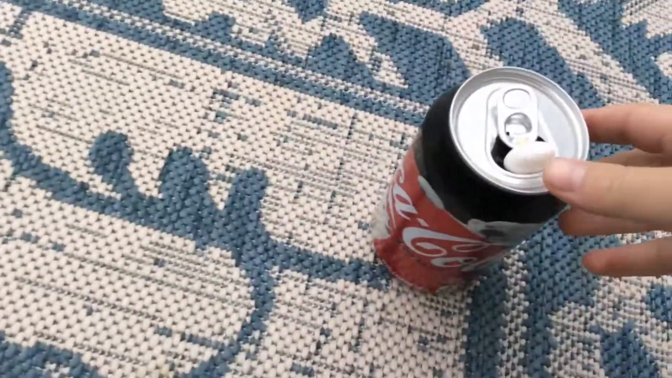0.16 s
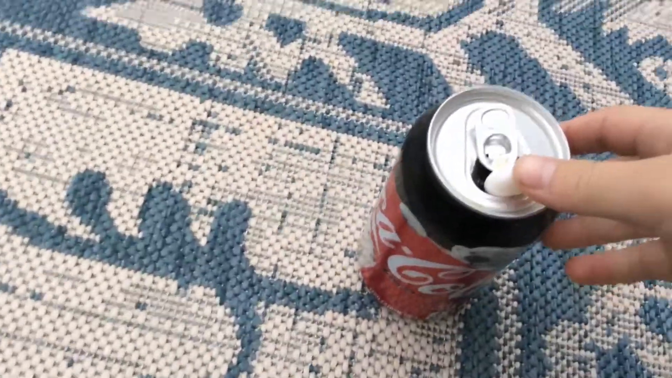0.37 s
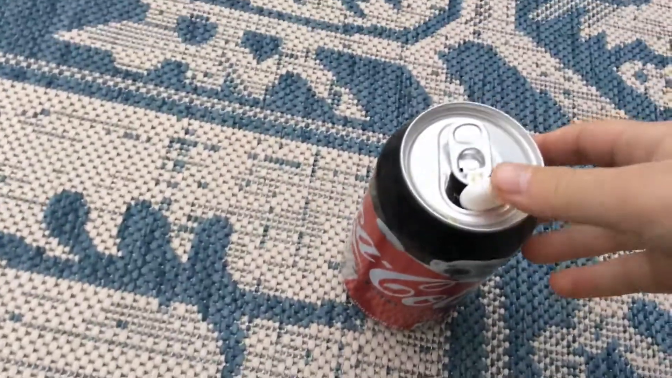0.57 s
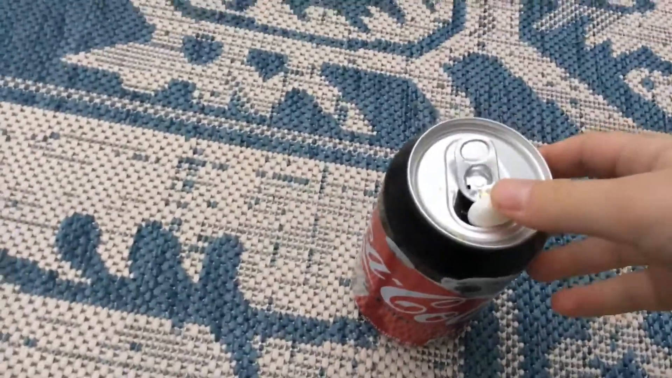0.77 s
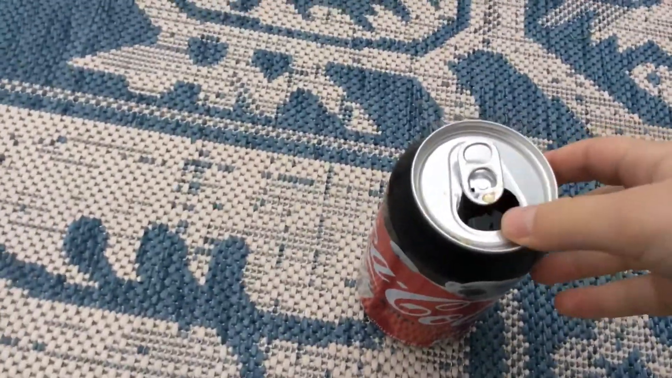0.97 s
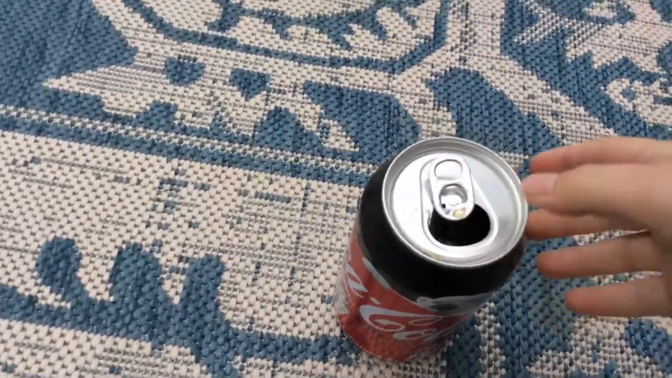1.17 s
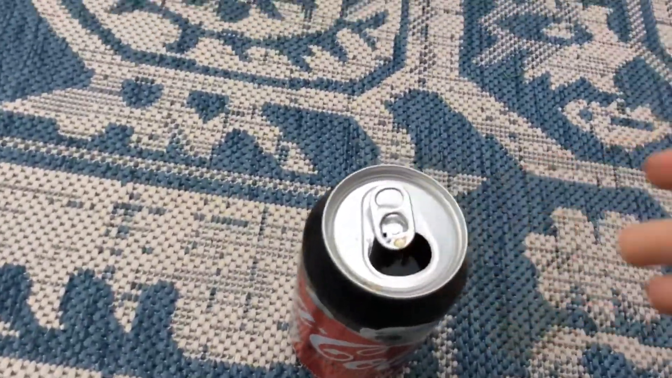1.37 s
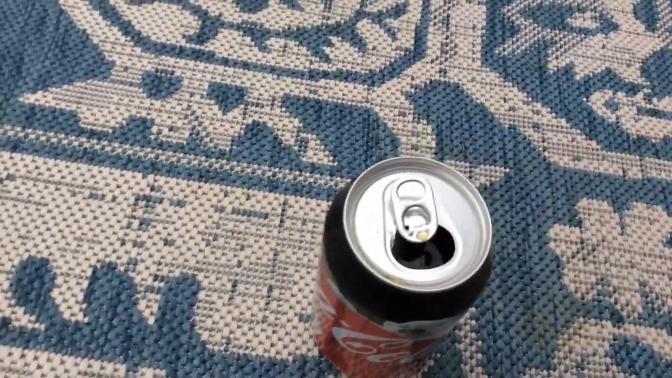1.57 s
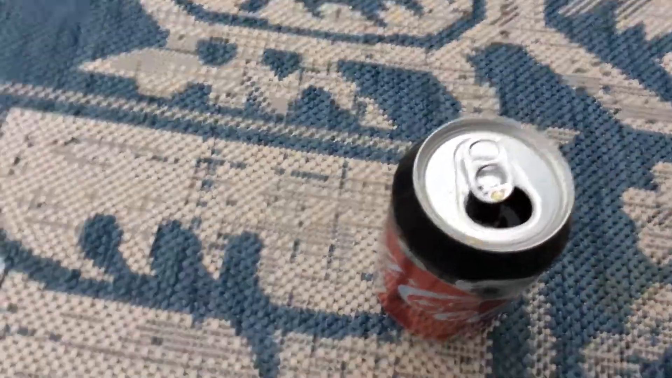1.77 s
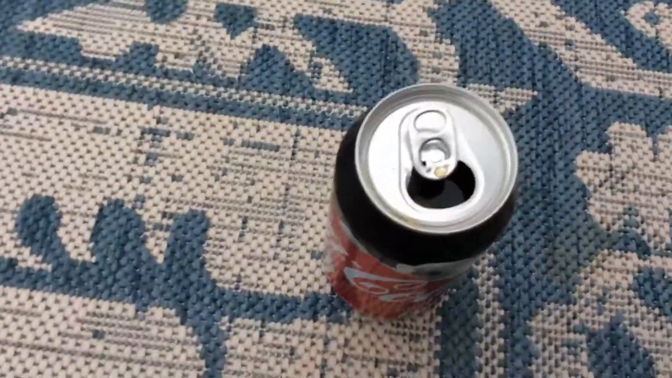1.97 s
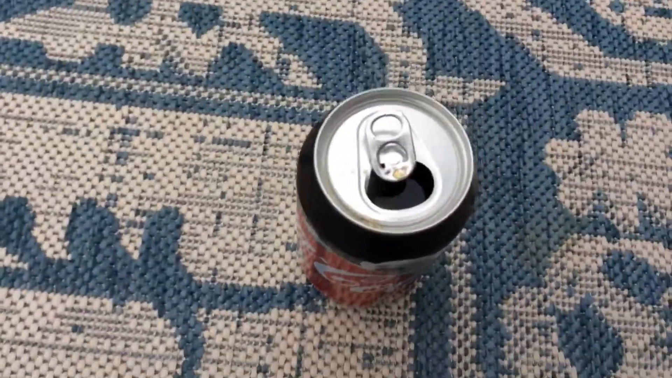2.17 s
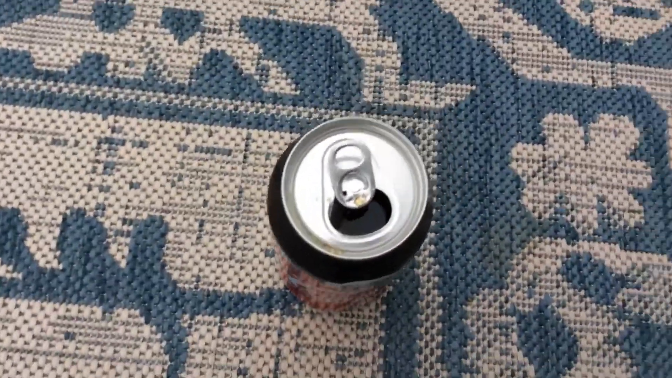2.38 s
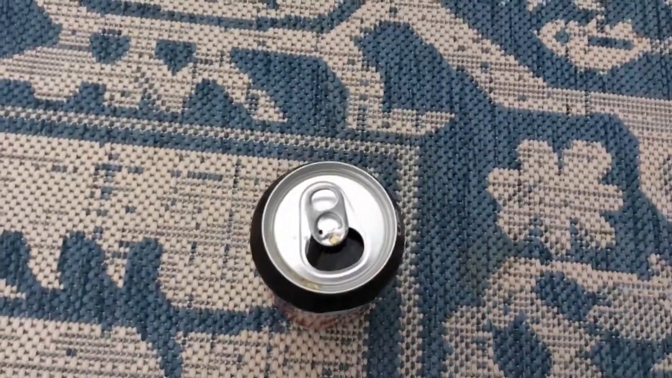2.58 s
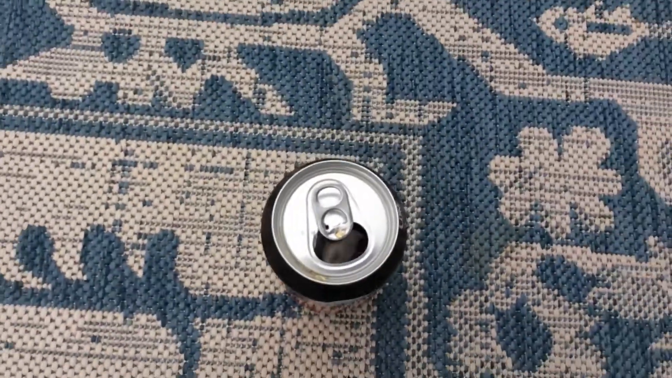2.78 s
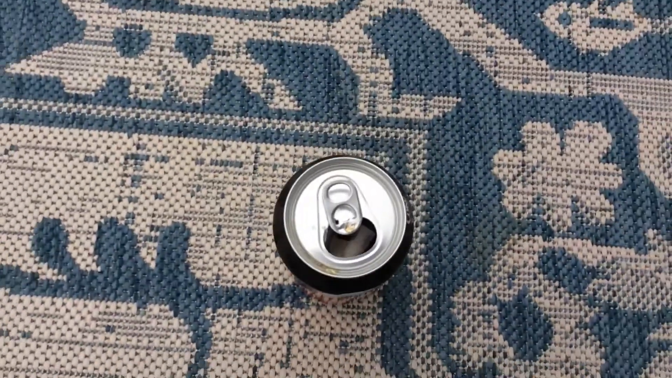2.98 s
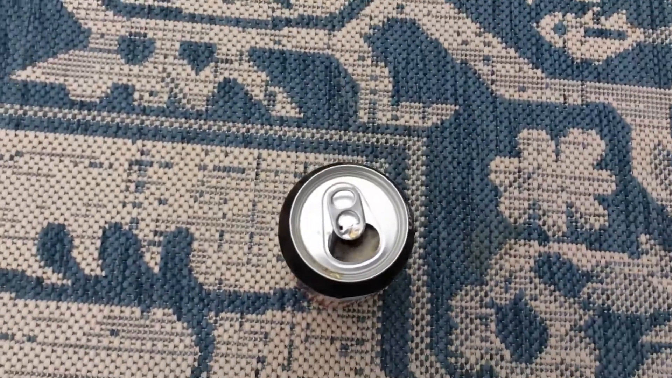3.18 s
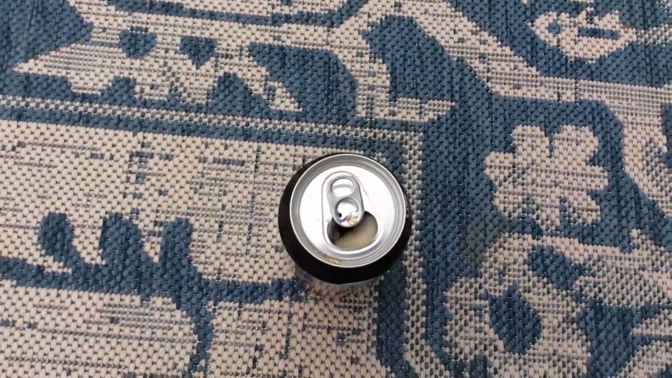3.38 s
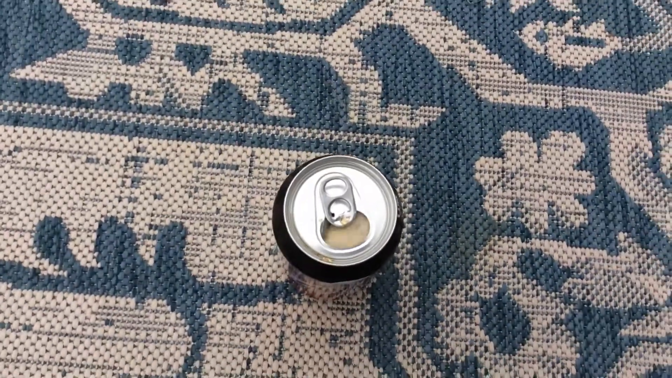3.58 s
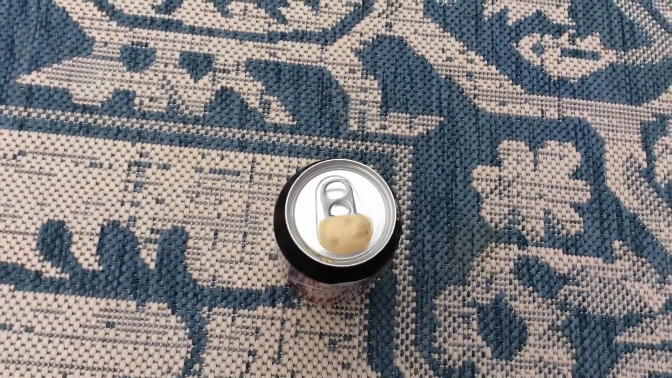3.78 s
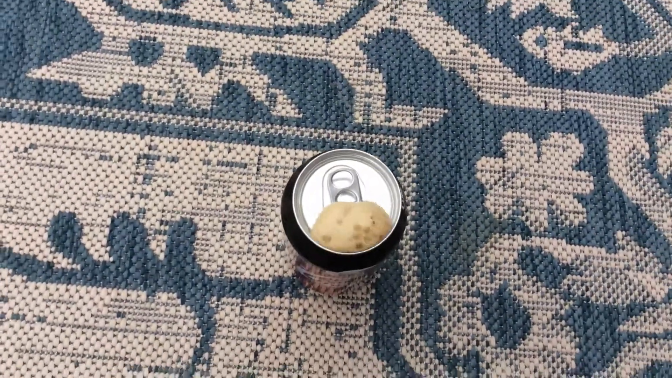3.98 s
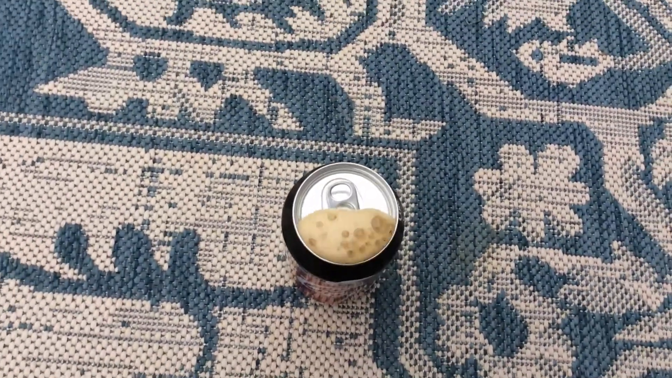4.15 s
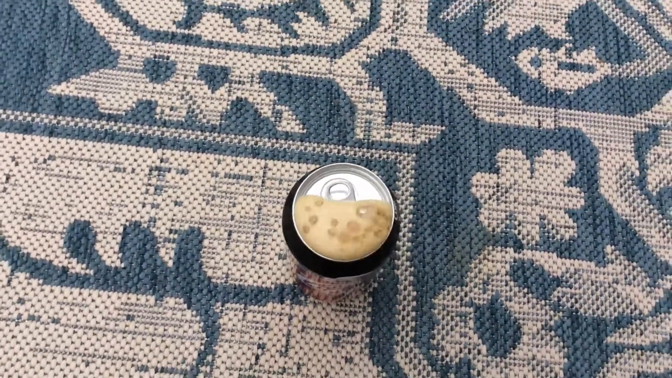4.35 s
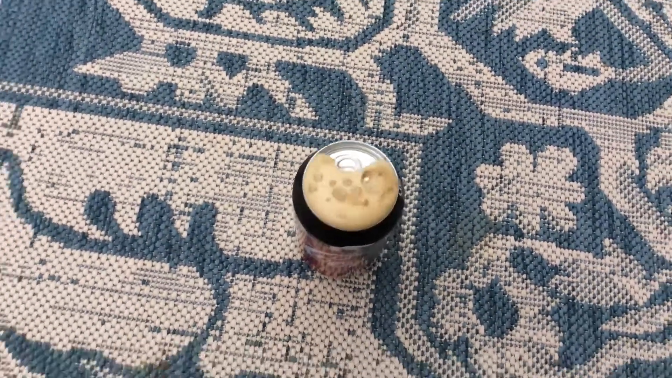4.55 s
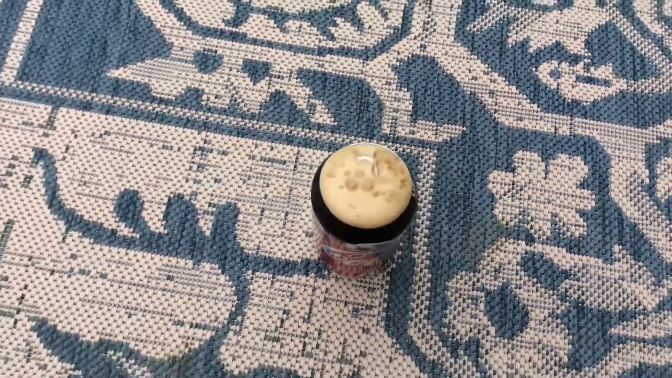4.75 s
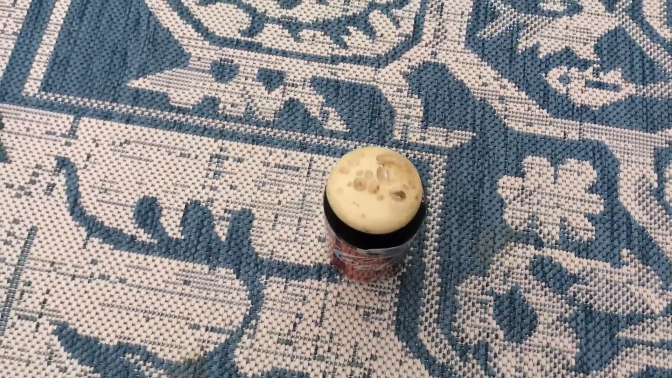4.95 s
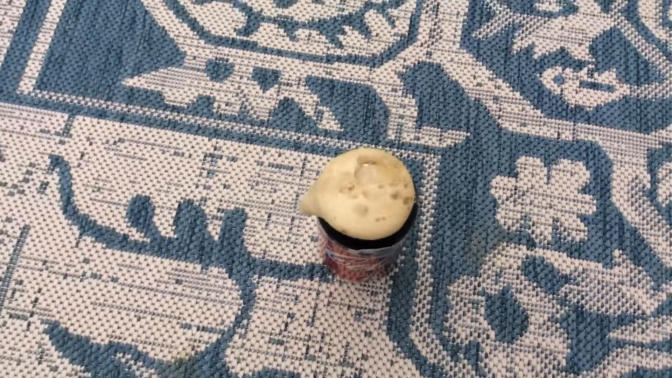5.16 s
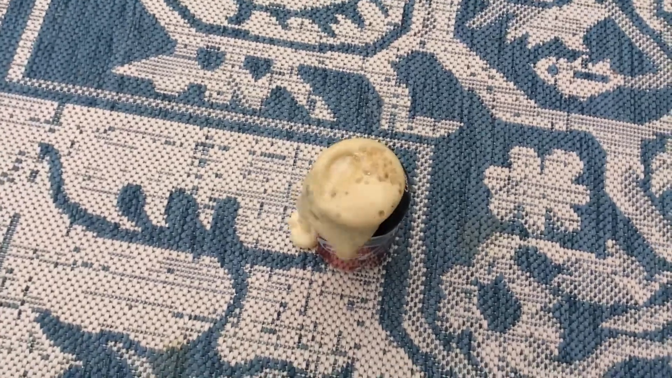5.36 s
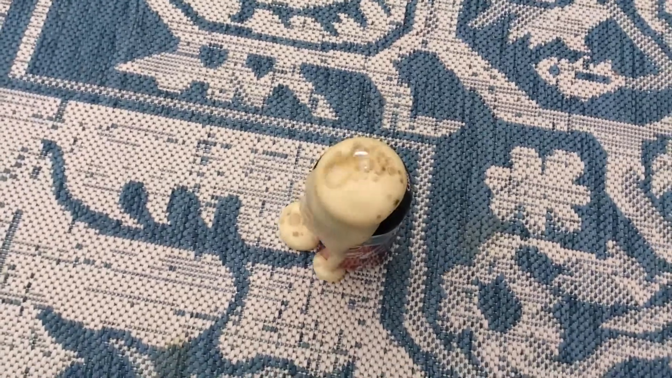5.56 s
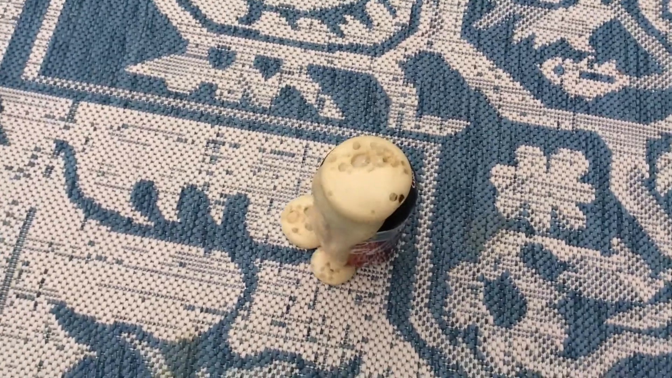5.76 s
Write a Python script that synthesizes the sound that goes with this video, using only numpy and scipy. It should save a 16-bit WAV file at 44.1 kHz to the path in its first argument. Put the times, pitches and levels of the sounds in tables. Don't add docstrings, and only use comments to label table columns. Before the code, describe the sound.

Close and dry in a quiet yard with a faint low rumble, a hard sweet is forced into an opened drink can with a short scrape and one very loud, bright metallic crack. A few light tinny bounces follow, then soft bumps and small spits of gas. Fine fizz rises from near silence into a steady, crackling foam hiss that lasts to the end.

```python
import sys
import numpy as np
from scipy import signal
from scipy.fft import rfft, irfft, next_fast_len
from scipy.io import wavfile
from scipy.ndimage import uniform_filter1d

SR = 44100
rng = np.random.default_rng(int(sys.argv[2]) if len(sys.argv) > 2 else 0)


def materialize(psi):
    bounded = np.clip(np.atleast_2d(psi).T, -1, 1)
    quanta = np.round(bounded * 32767).astype(np.int16)
    wavfile.write(sys.argv[1], SR, quanta)


def ratio(d):
    e = np.asarray(d, float) / 20
    return 10 ** e


N = 256838

# pitch_hz, level_db [dB per Hz]
RUMBLE_SPECTRUM = [(12, -44), (20, -15.5), (70, 4), (139, 0.5), (161, 2.5), (177, 2), (258, -9), (500, -26),
                   (650, -44), (1100, -120)]
# pitch_hz, level_db [dB per Hz]
AIR_SPECTRUM = [(150, -34), (250, -6), (303, -3.5), (330, -3), (367, -5.5), (761, -10.5), (1020, -10.5),
                (1500, -12.5), (1730, -15.5), (4120, -16), (4490, -17.5), (8400, -19.5), (16000, -42)]
# pitch_hz, level_db [dB per Hz]
LEAF_SPECTRUM = [(5000, -6.5), (9000, 10.5), (16000, -4.5)]
# pitch_hz, width_hz, level_db
MACHINE_HUMS = [(167, 21, -65), (84.7, 10, -68), (620, 12, -78.5), (715, 6, -77), (947, 16, -78),
                (1030, 45, -75.5), (1235, 8, -81.5)]
# time_s, strength_db
BREEZE_CURVE = [(0, 3), (.45, 3), (.9, 0), (1.05, -5), (1.3, 1), (2.3, 2), (2.5, 4), (2.72, -1), (3.16, 1),
                (4.3, -0.5), (5.82, -0.5)]
RUMBLE_DB, AIR_DB, RUSTLE_DB = -57, -63, -77.5
AIR_FOLLOWS, RUSTLE_FOLLOWS = 0.27, 0.53
LEAVES_S, LEAVES_RISE_S, LEAVES_DB = 1.12, 0.34, 7.5

# start_s, length_s, level_db, centre_hz, width_hz
SWELLS = [
    (.36, .12, -66, 4100, 500),
    (2.2, 0.085, -59.5, 8000, 7000),
    (2.44, 0.088, -68, 6000, 5970),
    (2.804, .04, -60.5, 8300, 4500),
    (3.54, .05, -62, 6000, 6000),
    (3.616, .055, -56, 7500, 4500),
    (.43, .09, -72, 3400, 600),
    (1.52, .09, -62, 1190, 90),
    (1.41, 0.11, -57.5, 1270, 400),
]
# start_s, length_s, level_db, centre_hz, width_hz
RIM_SCRAPES = [
    (.95, .026, -21.5, 6200, 7200),
    (.947, .03, -38, 13000, 5000),
    (.935, 0.013, -54, 8000, 6000),
]
# start_s, peak_db, pitch_hz, click_db, click_hz
MAT_BUMPS = [
    (0.366, -70, 1400, -56, 3900),
    (.508, -70, 340, -54, 5700),
    (1.892, -42, 270, -48, 900),
    (2.2269, -50.5, 604, -43, 1230),
    (2.382, -48.5, 560, -56, 900),
    (2.423, -46, 540, -63, 900),
    (2.481, -48.5, 590, -60, 906),
    (2.905, -54, 390, -52.5, 2600),
    (5.3565, -44, 294, -45.5, 1200),
]
BUMP_T60_S = 0.027

# pitch_hz, level_db, t60_s
WALL_MODES = [(450, -6, 0.025), (630, -4.5, 0.035), (910, -6, 0.043), (1027, -4, 0.1), (1214, 1, 0.078),
              (1300, -2.5, 0.11), (1450, -2.5, 0.077), (1536, -5.5, 0.13), (1645, -7, 0.085),
              (1900, 0, 0.037), (1980, -7, 0.059), (2100, -3.5, .045), (2504, 1.5, 0.035)]
# pitch_hz, width_hz, level_db
LID_CLUSTERS = [(2900, 630, 0.5), (3220, 560, 1.5), (3900, 730, -3), (4890, 930, -8.5), (5900, 580, -4.5),
                (6900, 690, -3.5), (7670, 570, -9), (8400, 810, -1.5), (10100, 2500, -1),
                (13100, 1700, -13), (15200, 900, -19.5)]
# pitch_hz, level_db [dB per Hz]
CRACK_SPECTRUM = [(1180, -36), (2000, 1), (2320, -12.5), (2550, -9.5), (2830, -18), (5070, -7),
                  (6820, -8.5), (10900, -17), (16000, -36.5)]
# start_s, crack_db, lid_centre_hz, wall_db, wall_centre_hz
PUSH_KNOCKS = [(.8954, -48, 7900, -58.5, 1500), (.943, -47, 8120, -54, 2100),
               (0.9479, -21.5, 6000, -42.5, 2000), (0.95, -16, 6600, -37, 1510),
               (0.953, -16, 8000, -28, 1640), (0.9568, -10, 7900, -28.5, 2200),
               (.9628, -1.5, 6800, -32.5, 1900), (.964, -3, 7100, -14.5, 1700),
               (0.9661, -1, 6520, -32, 2170), (0.967, -8, 8800, -22, 2205),
               (.972, -14.5, 6900, -13.5, 1988), (.9745, -22.5, 6200, -28, 950),
               (0.981, -25.5, 3900, -34.5, 1900)]
# start_s, crack_db, lid_centre_hz, wall_db, wall_centre_hz
LET_GO_KNOCKS = [
    (0.997, -45, 9500, -40.5, 1550),
    (1.024, -28, 8400, -43, 1600),
    (1.026, -25, 4700, -32, 1560),
    (1.035, -46, 3330, -36.5, 1360),
]
# start_s, crack_db, lid_centre_hz, wall_db, wall_centre_hz
BOUNCE_KNOCKS = [(1.052, -32, 9800, -55, 1270), (1.056, -37, 7000, -45, 1230),
                 (1.298, -43, 8250, -67.5, 1500), (1.407, -27, 2620, -24.5, 1790),
                 (1.409, -27, 15200, -60, 1250), (1.4102, -25.5, 8400, -29.5, 1235),
                 (1.415, -46, 8300, -26.5, 544), (1.4635, -20.5, 3200, -30.5, 1790),
                 (1.463, -23.5, 5900, -36, 1450), (1.508, -39, 2900, -34, 2100),
                 (1.514, -29.5, 6860, -32.5, 1100), (1.558, -45, 2900, -43.5, 2090),
                 (1.5843, -56, 2900, -54, 1150)]
PUSH_T60_S, LET_GO_T60_S, BOUNCE_T60_S = 0.03, 0.048, 0.032
# start_s, peak_db, pitch_hz
EDGE_SNAPS = [
    (.963, -11, 6000),
    (.966, -3.5, 6500),
    (0.972, -12.5, 2006),
    (1.4077, -26, 2200),
    (1.4635, -25, 3000),
]
SNAP_CYCLES = 1.1
CAN_LOW_HZ = 760

HEAD_S, HEAD_LENGTH_S = 1.024, 0.176
HEAD_START_HZ, HEAD_END_HZ, HEAD_SAG_S = 1649, 1180, 0.017
HEAD_DB, HEAD_DROP_DB, HEAD_DROP_S, HEAD_FADE_DB_PER_S = -40.5, 17.5, 0.041, 33

# time_s, level_db
FIZZ_LEVEL = [(1.6, -76.5), (1.93, -68.5), (2.1, -73), (2.4, -75), (2.52, -68), (2.95, -62), (3.15, -57.5),
              (3.57, -56), (3.69, -61), (3.95, -55), (4.48, -51.5), (5.22, -50.5), (5.37, -48.5),
              (5.82, -48)]
# pitch_hz, level_db [dB per Hz]
BEHIND_LID_SPECTRUM = [(900, -40), (1400, -2.5), (1950, -8.5), (2750, 2.5), (3500, -4.5), (4050, -2.5),
                       (5600, -5), (6500, -4.5), (7900, -3), (8500, -0.5), (10500, -7), (14000, -21),
                       (15900, -22)]
# pitch_hz, level_db [dB per Hz]
OPEN_FOAM_SPECTRUM = [(900, -41), (1300, -15), (2000, -20), (2750, -7.5), (3550, -5), (4000, 0.5),
                      (4500, -3.5), (5450, 0.5), (6050, -2), (6700, -0.5), (7900, -4.5), (8300, -2.5),
                      (11900, -15), (15900, -21)]
# time_s, open_share [0-1]
OVERFLOW_SHARE = [(1.6, 0.89), (2.9, 0.79), (3.2, 0.13), (3.6, 0.36), (3.75, 0.44), (4.2, 0.82),
                  (5.83, 0.95)]

GAP_S, GAP_LENGTH_S = 3.534, 0.056
GAP_START_HZ, GAP_END_HZ, GAP_CLOSE_S = 5920, 7600, 0.018
GAP_PEAK_DB, GAP_PEAK_AT_S, GAP_SWELL_DB, GAP_SHUT_DB_PER_S2 = -51.5, 0.027, 10, 40000

# width_hz, added_share [0-1]
MIC_PORT = (130, .6)
MIC_HZ, EDGE_HZ = 8170, 15800


def evened(x):
    return x / np.sqrt(np.mean(x ** 2) + 1e-20)


def add(mix, s, sound):
    part = mix[round(s * SR):][:len(sound)]
    part += sound[:len(part)]


def columns(rows):
    s, *values = np.transpose(rows)
    return [np.interp(np.arange(N) / SR, s, v) for v in values]


def colour(x, points):
    f, db = np.transpose(points)
    size = next_fast_len(len(x))
    hz = np.fft.rfftfreq(size, 1 / SR)
    gain = ratio(np.interp(np.log(hz + 1), np.log(f), db, -90, -90))
    return evened(irfft(rfft(x, size) * gain, size)[:len(x)])


def resonate(x, hz, width):
    return signal.lfilter(*signal.iirpeak(hz, hz / width, SR), x)


def drift(seconds):
    size = int(seconds * SR) + 1
    smooth = uniform_filter1d(rng.standard_normal(N), size)
    return evened(uniform_filter1d(smooth, size))


def yard():
    breeze_db = columns(BREEZE_CURVE)[0]
    stir_db = LEAVES_DB * np.clip((np.arange(N) / SR - LEAVES_S) / LEAVES_RISE_S, 0, 1)
    rumble_db = RUMBLE_DB + breeze_db + 1.6 * drift(0.019)
    air_db = AIR_DB + AIR_FOLLOWS * breeze_db
    rustle_db = RUSTLE_DB + stir_db + RUSTLE_FOLLOWS * breeze_db
    mix = ratio(rumble_db) * colour(rng.standard_normal(N), RUMBLE_SPECTRUM)
    mix += ratio(air_db) * colour(rng.standard_normal(N), AIR_SPECTRUM)
    mix += ratio(rustle_db) * colour(rng.standard_normal(N), LEAF_SPECTRUM)
    for hz, width, db in MACHINE_HUMS:
        hum = evened(resonate(rng.standard_normal(N), hz, width))
        mix += ratio(db + 1.5 * drift(0.23)) * hum
    return mix


def swell(length, db, hz, width):
    noise = resonate(rng.standard_normal(round(length * SR)), hz, width)
    hiss = evened(resonate(noise, hz, width))
    return ratio(db) * hiss * signal.windows.hann(len(noise))


def bump(db, hz, click_db, click_hz):
    t = np.arange(4000) / SR
    push = ratio(db - 60 * t / BUMP_T60_S) * np.sin(2 * np.pi * hz * t)
    click = np.sin(2 * np.pi * click_hz * t) * np.exp(-t / 0.0005)
    grit = evened(resonate(rng.standard_normal(len(t)), click_hz, 900))
    click += 0.23 * grit * np.exp(-t / 0.003)
    return push + ratio(click_db + 5.5) * click


def nearness(hz, centre_hz, octaves):
    return np.exp(-0.5 * (np.log2(hz / centre_hz) / octaves) ** 2)


def lid_ring(t, centre_hz, t60):
    lid = np.zeros(len(t))
    for hz, width, db in LID_CLUSTERS:
        place, phase = rng.random((2, 6))
        mode_hz = hz + 0.98 * width * (place - 0.5)
        modes = np.sin(2 * np.pi * (np.outer(t, mode_hz) + phase)).sum(axis=1)
        ring_s = t60 * (6000 / hz) ** 0.24
        lid += (0.08 + nearness(hz, centre_hz, 0.25)) * ratio(db - 60 * t / ring_s) * modes
    return lid


def wall_ring(t, centre_hz, t60):
    grip = t60 / 0.056
    wall = np.zeros(len(t))
    for hz, db, ring_s in WALL_MODES:
        uneven, phase = rng.random(2)
        level = ratio(db + 5.1 * uneven - 60 * t / (ring_s * grip))
        wall += (0.004 + nearness(hz, centre_hz, 0.32)) * level * np.sin(2 * np.pi * (hz * t + phase))
    return wall


def knock(crack_db, lid_hz, wall_db, wall_hz, t60):
    t = np.arange(9000) / SR
    noise = rng.standard_normal(len(t))
    crack = 1.5 * colour(noise, CRACK_SPECTRUM) * ratio(-60 * t / 0.008)
    rattle = colour(noise[::-1], CRACK_SPECTRUM) * ratio(-15 - 60 * t / 0.081)
    struck = crack + 0.55 * lid_ring(t, lid_hz, t60) + rattle
    wall = wall_ring(t, wall_hz, t60)
    rise = 1 - np.exp(-t / 0.0003)
    return ratio(crack_db - 10) * struck * rise + ratio(wall_db - 5) * wall * rise ** 2


def snap(db, hz):
    t = np.arange(600) / SR
    return ratio(db) * np.sin(2 * np.pi * hz * t) * np.exp(-t * hz / SNAP_CYCLES)


def whistle(hz, db, flutter, waver):
    a, b = evened(uniform_filter1d(rng.standard_normal((2, len(hz))), size=150))
    tone = np.sqrt(2) * np.sin(2 * np.pi * np.cumsum(hz * (1 + waver * b)) / SR)
    return ratio(db) * (1 + flutter * a) * tone * signal.windows.tukey(len(hz), 0.15)


def headspace():
    t = np.arange(0, HEAD_LENGTH_S, 1 / SR)
    hz = HEAD_END_HZ + (HEAD_START_HZ - HEAD_END_HZ) * np.exp(-t / HEAD_SAG_S)
    drop_db = HEAD_DROP_DB * (1 - np.exp(-(t / HEAD_DROP_S) ** 2))
    db = HEAD_DB - drop_db - HEAD_FADE_DB_PER_S * t
    return whistle(hz, db, flutter=0.47, waver=0.006)


def patchy(x, depth_db=0.7):
    z = signal.stft(x, nperseg=512)[2]
    patches = uniform_filter1d(rng.standard_normal(z.shape), size=7, axis=0)
    patches = uniform_filter1d(patches, size=16, axis=1)
    return signal.istft(z * ratio(depth_db * evened(patches)), nperseg=512)[1][:N]


def fizz(pops_per_s=5000, spread_db=-1.5):
    pops, t = np.zeros(N), np.arange(200) / SR
    size = ratio(spread_db * np.minimum(rng.exponential(1, N), 5))
    size *= rng.random(N) < pops_per_s / SR
    kind = rng.integers(0, 16, N)
    for k, hz in enumerate(np.geomspace(1500, 15000, num=16)):
        bubble = np.sin(2 * np.pi * hz * t * (1 + 60 * t)) * np.exp(-t * hz / 2.7)
        bubble = bubble / np.linalg.norm(bubble) * np.sqrt(hz)
        pops += signal.oaconvolve(size * (kind == k), bubble)[:N]
    pops = evened(pops) + 1.7 * rng.standard_normal(N)
    db = columns(FIZZ_LEVEL)[0]
    share = np.clip(columns(OVERFLOW_SHARE)[0], 0, 1)
    mixed = (1 - share) * colour(pops, BEHIND_LID_SPECTRUM) + share * colour(pops, OPEN_FOAM_SPECTRUM)
    start = np.clip((np.arange(N) / SR - 1.45) / 0.14, 0, 1)
    return start * ratio(db + 0.5 * drift(0.03)) * patchy(mixed)


def foam_gap():
    t = np.arange(0, GAP_LENGTH_S, 1 / SR)
    hz = GAP_END_HZ + (GAP_START_HZ - GAP_END_HZ) * np.exp(-t / GAP_CLOSE_S)
    swell_db = GAP_SWELL_DB * np.maximum(1 - t / GAP_PEAK_AT_S, 0)
    shut_db = GAP_SHUT_DB_PER_S2 * np.maximum(t - GAP_PEAK_AT_S, 0) ** 2
    return whistle(hz, GAP_PEAK_DB - swell_db - shut_db, flutter=0.4, waver=0.008)


def scene():
    mix, gripped = yard(), np.zeros(N)
    for s, *row in SWELLS + RIM_SCRAPES:
        add(mix, s, swell(*row))
    for s, *row in MAT_BUMPS:
        add(mix, s, bump(*row))
    for s, *row in PUSH_KNOCKS:
        add(gripped, s, knock(*row, PUSH_T60_S))
    for s, *row in EDGE_SNAPS:
        add(gripped, s, snap(*row))
    for s, *row in LET_GO_KNOCKS:
        add(gripped, s, knock(*row, LET_GO_T60_S))
    add(mix, HEAD_S, headspace())
    for s, *row in BOUNCE_KNOCKS:
        add(mix, s, knock(*row, BOUNCE_T60_S))
    mix += fizz()
    add(mix, GAP_S, foam_gap())
    no_bass = signal.butter(6, CAN_LOW_HZ, "high", fs=SR, output="sos")
    return (mix + signal.sosfilt(no_bass, gripped))[None]


def band_limit(x):
    return signal.sosfilt(signal.butter(12, 16440, fs=SR, output="sos"), x)


def record(dry):
    width, share = MIC_PORT
    heard = dry + share * resonate(dry, MIC_HZ, width)
    heard = signal.lfilter(*signal.butter(1, 40, "high", fs=SR), heard)
    heard = heard / (1 + (heard / 0.96) ** 8) ** (1 / 8)
    top_cut = signal.firwin(1023, EDGE_HZ, window=("kaiser", 9), fs=SR)
    heard = signal.oaconvolve(heard, top_cut[None], "same")
    return band_limit(heard)


dry = scene()
out = record(dry)
materialize(out)
```